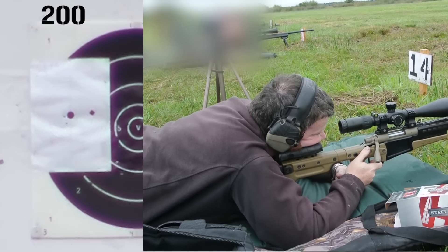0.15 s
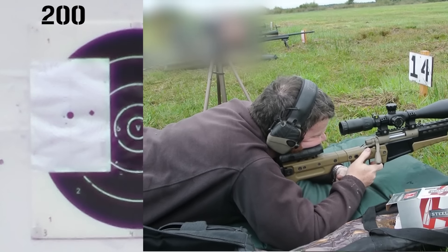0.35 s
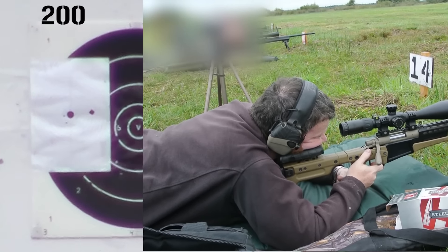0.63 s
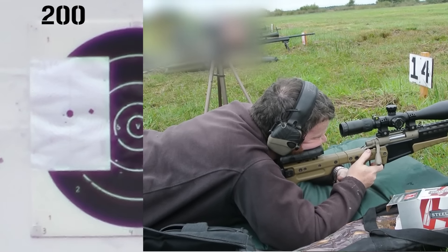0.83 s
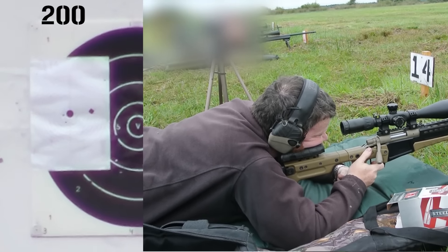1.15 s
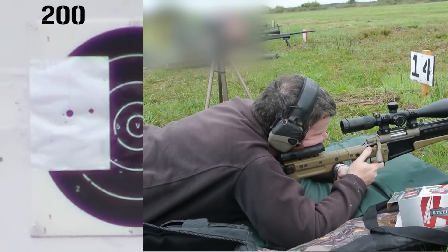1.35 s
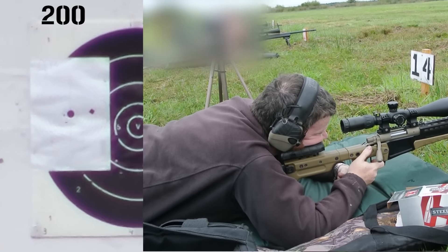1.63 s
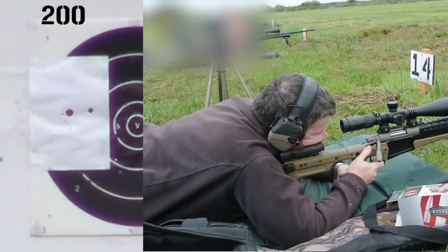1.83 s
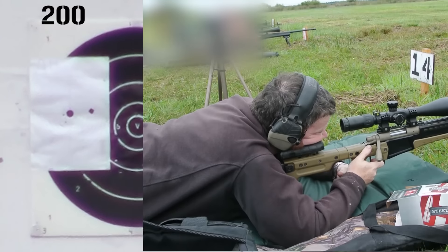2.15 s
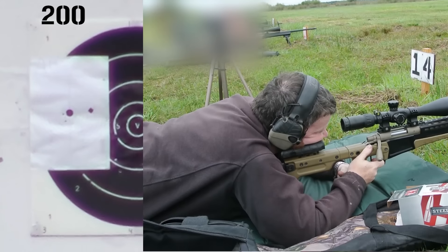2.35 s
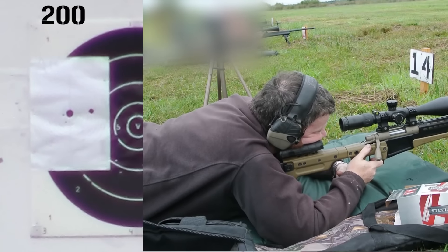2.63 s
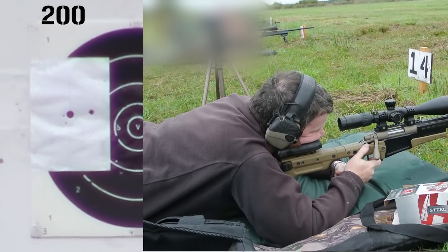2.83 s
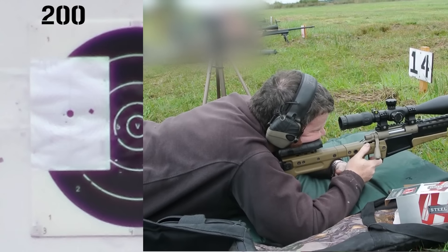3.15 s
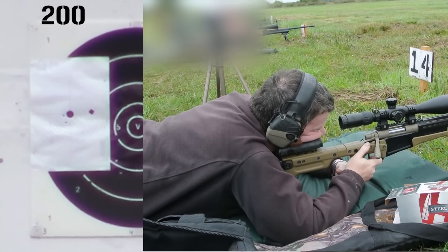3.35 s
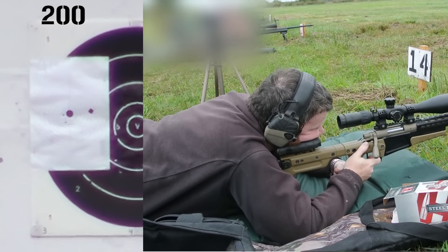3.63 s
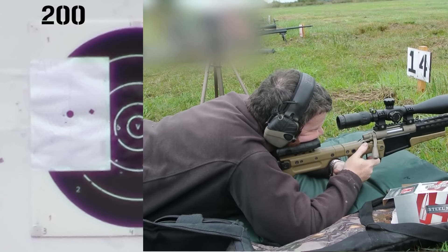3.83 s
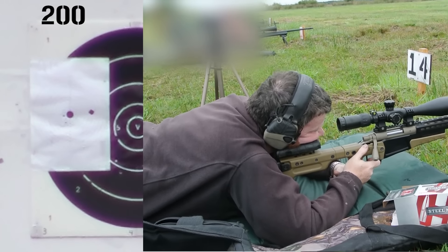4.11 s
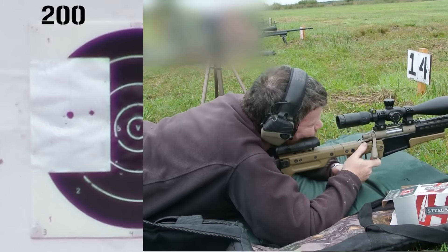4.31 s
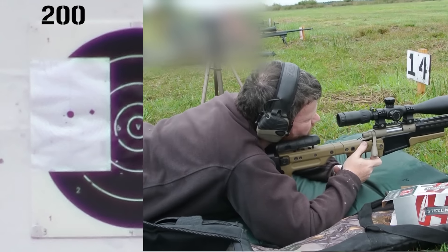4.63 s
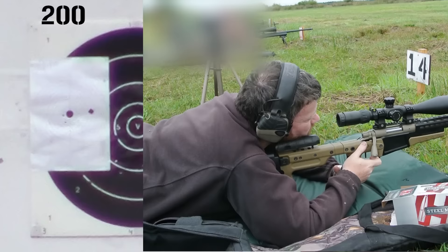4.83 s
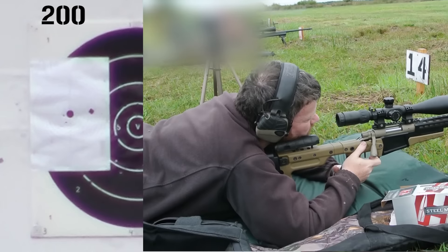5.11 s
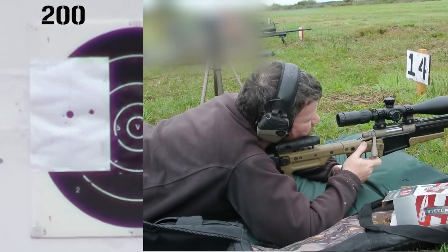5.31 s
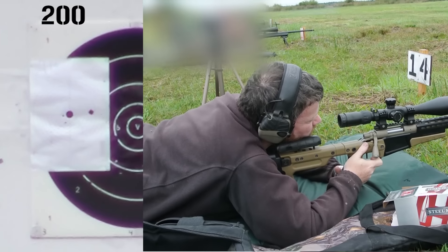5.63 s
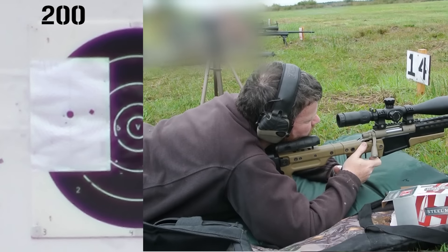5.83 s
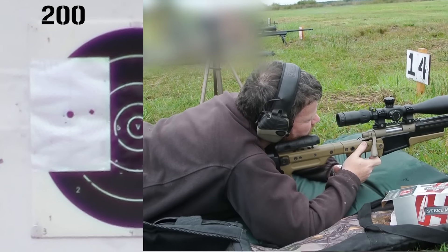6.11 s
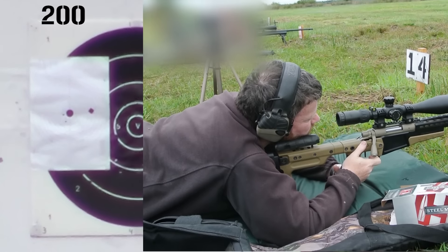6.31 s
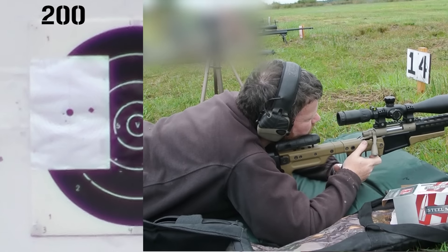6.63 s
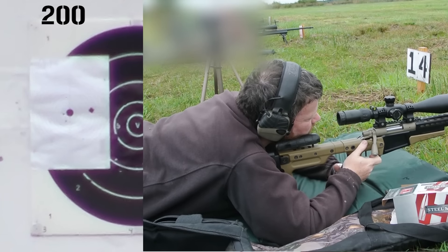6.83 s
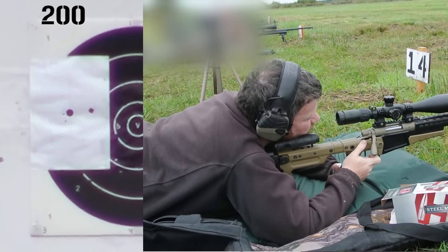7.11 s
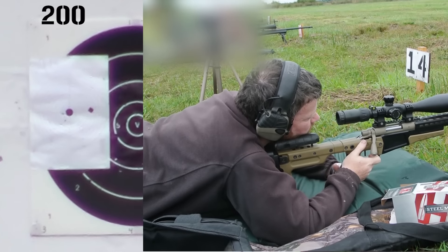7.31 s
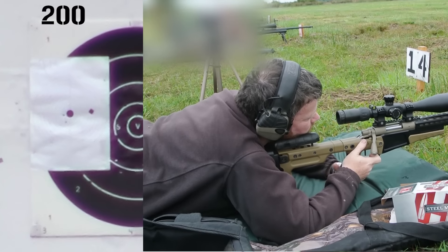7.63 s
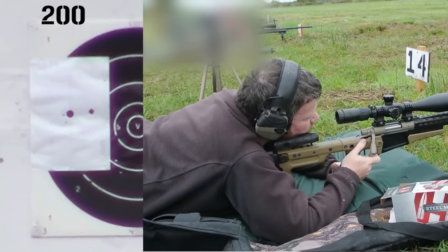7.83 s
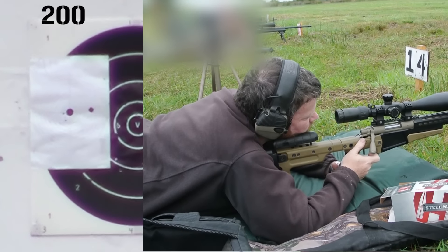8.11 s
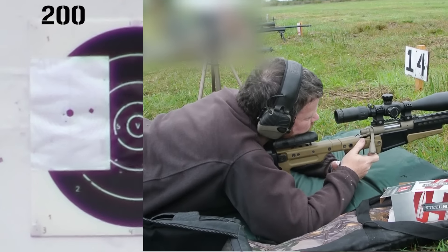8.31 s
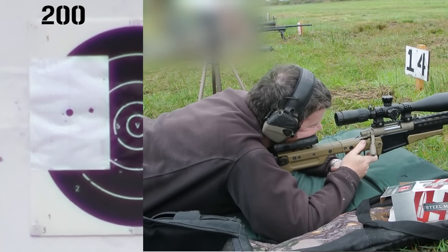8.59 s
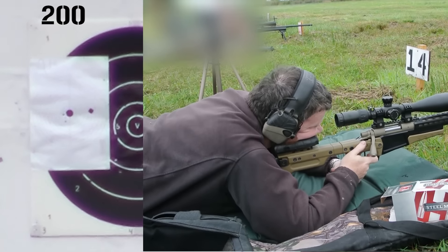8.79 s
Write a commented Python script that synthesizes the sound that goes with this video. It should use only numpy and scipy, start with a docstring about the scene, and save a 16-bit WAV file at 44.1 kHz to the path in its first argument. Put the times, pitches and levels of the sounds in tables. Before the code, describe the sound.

On an outdoor firing line with a faint rustle of grass and trees, four rifle shots go off at uneven intervals, echoing for about a second each. The second has the hardest crack. After it come quiet knocks of gear and the light metallic clicks and scrapes of a bolt. The last two shots carry a bright hiss, while low, lumpy wind rumble builds on the microphone.

```python
"""Four rifle shots from neighbours on the firing line of an open, grassy range.
Each is a shock-wave crack, a low thump and a hiss of muzzle gas that the field scatters back;
banks and trees reflect it for about a second. In the lull a rifle bolt is worked and its steel rings.
Gear knocks along the line, grass and trees rustle, and rising gusts buffet the microphone."""
import sys
import numpy as np
from scipy import signal
from scipy.fft import rfft, irfft, next_fast_len
from scipy.io import wavfile

SR = 44100
rng = np.random.default_rng(int(sys.argv[2]) if len(sys.argv) > 2 else 0)


def waveform_to_disk(signal):
    """Save audio, clipped to [-1, 1], as 16-bit WAV at the path in sys.argv[1]."""
    frames = np.transpose(np.atleast_2d(signal))
    scaled = np.clip(frames, -1, 1) * 32767
    samples = np.round(scaled).astype(np.int16)
    wavfile.write(sys.argv[1], SR, samples)


N = 395136
TIME = np.arange(N) / SR
AGE, BRIEF = TIME[:round(1.4 * SR)], TIME[:SR // 5]   # time axes of a shot and of a short event

# the shots: start_s, crack_db, thump_db, thump_hz, swell_s, reflection_db, roll_db, roll_hz
SHOTS = [(0.9028, 4, -1.5, 198, 0.0031, -27.5, -24.5, 255.2),
         (2.021, 13, -0.5, 187.4, 0.00165, -9, -28, 318.4), (5.048, -23, -5.5, 189, 0.002, -26, -31, 305),
         (7.1351, -18, -5, 187, 0.0032, -29, -25.5, 250)]
# spectrum of a sharp burst off a hard surface: frequency_hz, density_db
BURST_SPECTRUM = [(400, -19.5), (900, -12.5), (1500, -3), (3000, 4.5), (4800, -4.5), (7000, -11),
                  (11000, -18), (15500, -19.5)]
# spectrum of what grass and leaves send back: frequency_hz, density_db
FIELD_SPECTRUM = [(500, -15), (1000, -8.5), (1600, -1), (2500, 5), (3600, 4), (5000, -2), (7000, -7.5),
                  (9500, -12), (12000, -15.5), (15500, -29)]
# the background level, which ducks after the first two shots and creeps back: time_s, relative_level_db
BACKGROUND_LEVEL = [(0.0, -66), (0.82, -68.5), (1.27, -74.5), (1.97, -71), (2.14, -84), (3.67, -82.5),
                    (4.21, -79), (4.62, -78), (5.89, -71.5), (6.69, -70), (8.11, -61), (8.96, -62.5)]


def from_db(db):
    return 10 ** (np.asarray(db) / 20)


def panned(x, left_db):
    """A level difference between the channels places a source to one side."""
    return x * from_db([[left_db / 2], [-left_db / 2]])


def add(out, start_s, x):
    """Superposition: x adds to the sound from start_s on."""
    at = int(np.clip(round(start_s * SR), 0, N - 1))
    out[:, at:at + x.shape[-1]] += x[..., :N - at]


def low_pass(x, hz):
    return signal.sosfilt(signal.butter(6, min(hz, .45 * SR), fs=SR, output="sos"), x)


def noise(spectrum, size, apart):
    """Unit-rms stereo noise from (frequency_hz, density_db) rows; apart is the side-to-mid ratio."""
    hz, db = np.transpose(spectrum)
    length = next_fast_len(size)
    bins = np.maximum(np.fft.rfftfreq(length, 1 / SR), 1)
    skirt = np.minimum(bins / hz[0], 1) ** 2
    gain = skirt * from_db(np.interp(np.log(bins), np.log(hz), db))
    mid, side = irfft(rfft(rng.standard_normal((2, length))) * gain, length)[:, :size]
    x = mid + apart * side * [[1], [-1]]
    return x / x.std()


def lumps(size, spread_db):
    """Random amplitude modulation: a gain with a few dozen humps a second."""
    return from_db(spread_db * noise([(2, -4), (18, -1.5), (60, -22.5), (600, -88)], size, apart=.2))


def swell(peak_s):
    """Envelope of a critically damped response: rises to 1 at peak_s, then dies away."""
    return BRIEF / peak_s * np.exp(1 - BRIEF / peak_s)


def plateau(peak_s, hold_s, rise_db_per_s, fall_db_per_s):
    """Exponential growth to 1 at peak_s, a hold, then exponential decay."""
    early_s, late_s = np.maximum(peak_s - AGE, 0), np.maximum(AGE - peak_s - hold_s, 0)
    return from_db(-rise_db_per_s * early_s - fall_db_per_s * late_s)


def thump(hz, swell_s):
    """The microphone's bass cut leaves a pressure push as a few low cycles: a resonance passed twice."""
    radius = np.exp(-1 / (swell_s * SR))
    poles = [1, -2 * radius * np.cos(2 * np.pi * hz / SR), radius * radius]
    impulse = 1. * (BRIEF == 0)
    x = signal.lfilter([1, -1], poles, signal.lfilter([-1, 1], poles, impulse))
    return x / np.abs(x).max()


def rustle(gain_db=4):
    """Airflow through distant grass and trees makes smooth broadband noise."""
    # spectrum of the rustle: frequency_hz, density_db
    spectrum = [(150, -3), (380, 2), (560, -2.5), (750, -2), (1100, 0.5), (1400, -3), (1650, -3),
                (2000, -8), (3000, -10.5), (3800, -11.5), (5000, -16), (8000, -19.5), (12000, -26.5),
                (15500, -44)]
    level_db = gain_db + np.interp(TIME, *np.transpose(BACKGROUND_LEVEL))
    return from_db(level_db) * noise(spectrum, N, apart=.39)


def wind_strength(background_gain_db=-2):
    """Incoherent sources add in power: a floor that follows the background level, plus gusts."""
    # bell-shaped gusts: centre_s, relative_level_db, half_length_s
    gusts = [(.25, -70, 0.14), (5.81, -68, 0.9), (6.142, -46, 0.12), (6.65, -47, .17), (7.004, -45.5, 0.44),
             (8.315, -38, 0.21), (8.825, -38.5, 0.21)]
    floor = from_db(background_gain_db + np.interp(TIME, *np.transpose(BACKGROUND_LEVEL)))
    gust_power = sum((from_db(db) * np.exp(-np.minimum(((TIME - centre_s) / half_s) ** 2, 20))) ** 2
                     for centre_s, db, half_s in gusts)
    return np.sqrt(floor ** 2 + gust_power)


def wind(rumble_gain_db=2, eddy_gain_db=-5, breakup_gain_db=-9, swell_cycles=.85):
    """Turbulence makes a lumpy rumble; the largest eddies thump the microphone and break up."""
    # spectrum of the turbulent pressure: frequency_hz, density_db
    rumble_spectrum = [(25, -26), (50, -12), (90, 3.5), (160, 2.5), (260, -6), (370, -11.5), (520, -24),
                       (800, -39), (1500, -55.5)]
    # the strongest eddies: start_s, relative_level_db, pitch_hz
    buffets = [(3.62, -55, 107), (3.713, -52.5, 197), (4.964, -51, 152.4), (5.672, -40.5, 162),
               (5.831, -38, 150), (6.023, -26.5, 138), (6.101, -30, 194.5), (6.203, -22.5, 170.7),
               (6.467, -29.5, 197.8), (6.797, -27.5, 209), (6.955, -18.5, 167), (7.017, -26, 206),
               (7.039, -22.5, 178), (7.166, -16, 221), (7.945, -22.5, 270), (8.154, -21, 171),
               (8.274, -20.5, 176), (8.375, -14, 161), (8.42, -17, 191), (8.708, -16.5, 203),
               (8.833, -16.5, 239), (8.909, -11.5, 196)]
    breakup_spectrum = [(60, -26), (110, -1), (180, 7), (370, -3), (600, -23), (1000, -44), (3000, -80)]
    strength = wind_strength() * from_db(rumble_gain_db) * lumps(N, spread_db=4.5)
    out = strength * noise(rumble_spectrum, N, apart=.2)
    for start_s, db, hz in buffets:
        swell_s = swell_cycles / hz   # larger eddies are lower and slower
        eddy = from_db(eddy_gain_db) * panned(thump(hz, swell_s), rng.normal(0, 1.2))
        breakup = from_db(breakup_gain_db) * noise(breakup_spectrum, len(BRIEF), apart=.85)
        add(out, start_s, from_db(db) * (eddy + breakup * swell(1.25 * swell_s)))
    return low_pass(out, hz=900)


def faint_ticks():
    """Narrow-band noise in very short bursts is heard as dry ticks with a hint of pitch."""
    # ticks before the first shot: start_s, level_db, pitch_hz
    ticks = [(0.38, -60.5, 3830), (0.616, -58, 3460), (.838, -60, 3100)]
    out = np.zeros((2, N))
    for start_s, db, hz in ticks:
        band = noise([(hz / 2, -18), (hz, 0), (hz * 1.3, -18), (hz * 2, -35)], len(BRIEF), apart=.22)
        add(out, start_s, from_db(db) * band * swell(peak_s=.0018))
    return out


def gear_knocks():
    """Heavily damped impacts: each is a dull thud with a clack on top."""
    # knocks of gear along the line: start_s, thud_db, clack_db, decay_s
    knocks = [(1.890, -38, -50.5, 0.0063), (2.469, -45.5, -72, .003), (2.526, -48, -72, 0.0043),
              (3.015, -53, -65, .005), (3.055, -65, -57.5, 0.0043), (3.098, -42.5, -61, 0.0089),
              (4.097, -74, -51, 0.0043), (4.299, -76, -54, 0.0064), (4.81, -74, -59.5, 0.0031),
              (4.8318, -50.5, -37.5, 0.0044), (6.882, -62, -59, 0.012)]
    spectrum = [(300, -3.5), (900, -10), (2400, 4.5), (5000, -8.5), (8000, -10.5), (15000, -50)]
    out = np.zeros((2, N))
    for start_s, thud_db, clack_db, decay_s in knocks:
        clack = noise(spectrum, len(BRIEF), apart=.21) * np.exp(-BRIEF / decay_s)
        add(out, start_s, from_db(thud_db) * thump(hz=230, swell_s=.0027) + from_db(clack_db) * clack)
    return out


def steel_ring(spread_db=10.5):
    """Modal vibration: each contact shares the same total power differently among the damped modes."""
    # modes of the bolt's steel: pitch_hz, level_db, t60_s, left_over_right_db
    modes = [(1484, -15, 0.039, -3), (1784, -25, 0.03, 1), (2160, -21, 0.037, -2), (2600, -31, .02, 0),
             (2980, -3, 0.034, 2), (3500, -26, 0.019, 4), (4310, -18, 0.022, 9), (6170, 0, 0.06, 14),
             (6300, -21.5, 0.031, 30), (6680, -22, 0.075, 6), (7030, -7, 0.03, 7), (7650, -26, 0.024, 15),
             (12020, -39, .06, -5), (13800, -35, 0.069, -6), (14340, -36, 0.12, -6)]
    mode_db = np.transpose(modes)[1]
    strengths = from_db(mode_db + rng.normal(0, spread_db, len(modes)))
    strengths *= np.linalg.norm(from_db(mode_db)) / np.linalg.norm(strengths)
    return sum(panned(strength * from_db(-60 * BRIEF / t60_s) * np.sin(2 * np.pi * hz * BRIEF), left_db)
               for (hz, _, t60_s, left_db), strength in zip(modes, strengths))


def bolt(ring_gain_db=-10, rattle_db=-59.5, rattle_s=.13, tick_s=.0038, slide_s=.047):
    """Impact and friction: each contact ticks, rings and slides on; the sliding steel sticks and slips."""
    # the bolt's main contacts: start_s, relative_level_db
    contacts = [(3.2177, -56.5), (3.255, -50), (3.2964, -47), (3.9556, -41), (4.0325, -46.5), (4.0557, -51),
                (4.0754, -50), (4.0962, -40.5), (4.1051, -37), (4.1212, -47), (4.1408, -42)]
    # the bolt sliding in its race: start_s, level_db, swell_s
    slides = [(3.25, -76.5, 0.034), (4.03, -80, 0.049), (4.134, -69.5, 0.019), (4.252, -73.5, 0.022)]
    scrape_spectrum = [(1200, -3), (1700, 2), (3200, 9), (4800, -16), (6500, -11), (9000, -28),
                       (15000, -26.5)]
    out = np.zeros((2, N))
    # every slide shakes a few light contacts loose
    rattles = [(start_s + rattle_s * when, rattle_db) for start_s, *_ in slides for when in rng.random(5)]
    tick_and_slide = from_db(-17.5) * np.exp(-BRIEF / tick_s) + from_db(-29.5) * np.exp(-BRIEF / slide_s)
    for start_s, db in contacts + rattles:
        ring = from_db(ring_gain_db) * steel_ring()
        contact = tick_and_slide * noise(BURST_SPECTRUM, len(BRIEF), apart=.6)
        add(out, start_s, from_db(db) * (ring + contact))
    for start_s, db, swell_s in slides:
        scrape = noise(scrape_spectrum, len(BRIEF), apart=.26)
        stick_slip_db = 9.5 * noise([(40, 10), (160, -5.5), (500, -29), (3000, -80)], len(BRIEF), apart=.1)
        add(out, start_s, from_db(db + stick_slip_db) * scrape * swell(swell_s))
    return out


def air_absorption(x, db_per_s_at_10khz=15.5):
    """Air absorbs treble along the path, so later returns are duller."""
    size, step_s = next_fast_len(len(AGE) + len(BRIEF)), AGE[-1] / 4
    spectrum = rfft(x, size)
    loss_db_per_s = db_per_s_at_10khz * (np.fft.rfftfreq(size, 1 / SR) / 10000) ** 2.8
    out = np.zeros_like(x)
    for k in range(5):   # crossfade through five travel times
        dulled = irfft(spectrum * from_db(-loss_db_per_s * k * step_s), size)[:, :len(AGE)]
        out += dulled * np.maximum(1 - np.abs(AGE / step_s - k), 0)
    return out


def foliage(tilt_db_per_octave, size):
    """Scattering by leaves and grass splinters a shot into gritty noise."""
    spectrum = [(hz, db + tilt_db_per_octave * np.log2(hz)) for hz, db in FIELD_SPECTRUM]
    grit_db = 1.5 * noise([(40, -1.5), (250, -1), (800, -23.5), (5000, -78.5)], size, apart=.1)
    return low_pass(noise(spectrum, size, apart=.057), hz=9000) * from_db(grit_db)


def far_echoes(tree_gap_s=.029, second_gain_db=2.9, woods_behind_s=.13):
    """Path length sets delay: bank, tree line and woods answer in turn over a diffuse wash and a boom."""
    # echo paths, one row per shooter's position: bank_delay_s, bank_db, bank_gap_s, trees_delay_s,
    # trees_db, woods_db, woods_tilt_db_per_octave, wash_db, boom_delay_s, boom_db
    paths = [(0.23, -56.5, 0.045, .657, -56, -62.5, -1.5, -62, .71, -52),
             (.282, -66.5, 0.021, .725, -62.5, -69.5, -0.5, -67, .51, -54.5),
             (.349, -53, 0.05, .727, -46.5, -54.5, -4, -58, 0.87, -60),
             (.281, -44.5, 0.02, .671, -40.5, -43.5, -5.5, -50, 0.47, -54)]
    out, size = np.zeros((2, N)), len(AGE)
    for (start_s, *_), path in zip(SHOTS, paths):
        bank_s, bank_db, bank_gap_s, trees_s, trees_db, woods_db, woods_tilt, wash_db, boom_s, boom_db = path
        bank, trees = (bank_s, bank_gap_s, bank_db, 3), (trees_s, tree_gap_s, trees_db, 0)
        for delay_s, gap_s, db, tilt in bank, trees:
            for k in range(2):   # each answers twice in quick succession
                echo = foliage(tilt, len(BRIEF)) * swell(peak_s=.01)
                add(out, start_s + delay_s + k * gap_s, from_db(db + k * second_gain_db) * echo)
        woods = foliage(woods_tilt, size) * lumps(size, spread_db=1.64)
        woods *= plateau(trees_s + woods_behind_s, hold_s=.1, rise_db_per_s=326, fall_db_per_s=115.5)
        # countless small returns from the whole field
        wash = air_absorption(noise(FIELD_SPECTRUM, size, apart=.16)) * lumps(size, spread_db=1.43)
        wash *= plateau(peak_s=.5, hold_s=.036, rise_db_per_s=21, fall_db_per_s=33)
        add(out, start_s, from_db(woods_db) * woods + from_db(wash_db) * wash)
        add(out, start_s, from_db(boom_db) * boom(boom_s))
    return out


def boom(peak_s):
    """Low-frequency reverberation builds slowly and unevenly, then dies quickly."""
    # spectrum of the low echo: frequency_hz, density_db
    spectrum = [(50, -24), (110, -4.5), (200, 2.5), (280, -4.5), (400, -17), (700, -38), (1500, -59.5)]
    envelope = plateau(peak_s, hold_s=.015, rise_db_per_s=24.5, fall_db_per_s=133)
    return noise(spectrum, len(AGE), apart=.15) * envelope * lumps(len(AGE), spread_db=5.5)


def slap_echoes(rise_s=.00087, decay_s=.0018):
    """Reflection from hard surfaces returns the crack as a short, splintered burst."""
    # echoes from banks and target frames: arrival_s, relative_level_db, cutoff_hz
    reflections = [(.917, -26, 4200), (.934, -17.5, 3730), (0.953, -23.5, 3270), (1.112, -35, 11000),
                   (1.156, -32.5, 8680), (1.288, -43, 5970), (2.0519, -15.5, 3340), (2.093, -37, 2600),
                   (2.322, -37, 2780), (2.334, -40, 2400), (2.404, -40, 5000), (2.4218, -29, 14700),
                   (2.839, -46.5, 12050), (5.383, -27, 9000), (7.391, -22, 8100)]
    out = np.zeros((2, N))
    envelope = np.minimum(BRIEF / rise_s, 1) * np.exp(-BRIEF / decay_s)
    for arrival_s, db, cutoff_hz in reflections:
        burst = low_pass(noise(BURST_SPECTRUM, len(BRIEF), apart=.12), cutoff_hz)
        add(out, arrival_s, from_db(db) * burst * envelope)
    return out


def ground_roll(hz, hold_s=.025, fall=1.273, sink_ratio=.72, sink_s=.14):
    """Low sound propagates over the ground in uneven waves, sinking in pitch as it goes."""
    band = [(1 / 4, -14), (1 / 2, -6), (1, 0), (1.2, -3), (1.9, -26), (10, -65)]   # ratio, density_db
    near, far = (noise([(ratio * centre_hz, db) for ratio, db in band], len(AGE), apart=.15)
                 for centre_hz in (hz, sink_ratio * hz))
    nearness = np.exp(-AGE / sink_s)
    sinking = np.sqrt(nearness) * near + np.sqrt(1 - nearness) * far
    fade = (1 + AGE / hold_s) ** -fall * (1 - AGE / AGE[-1]) ** .5
    return sinking * fade * lumps(len(AGE), spread_db=.5)


def grass_scatter(hold_s=.05, fall=1.8):
    """Backscatter from the grass follows a shot as a power-law tail."""
    # spectrum of the backscatter: frequency_hz, density_db
    spectrum = [(600, -13), (1200, -10), (2200, -2), (3600, 0), (5200, 2), (8000, 0.5), (11000, -4.5),
                (13500, -15), (15500, -24)]
    return air_absorption(noise(spectrum, len(AGE), apart=.25)) * (1 + AGE / hold_s) ** -fall


def from_left(x, lean, direct_s=.09):
    """Acoustic shadow: the housing shades the right port's treble; later returns come from all sides."""
    treble = signal.sosfilt(signal.butter(1, [5500, 9300], "band", fs=SR, output="sos"), x)
    return x + treble * np.clip(lean, 0, 1) * np.exp(-AGE / direct_s) * [[1], [-1]]


def muzzle_gas(blast_db, hiss_db, hold_s, fall, lean):
    """A turbulent jet: blast and hiss fade by a power law, roughened as the gas leaves in eddies."""
    # spectrum of the jet's hiss: frequency_hz, density_db
    hiss_spectrum = [(1000, -14.5), (2200, -7.5), (3300, 3.5), (5000, -12), (6600, 0), (8300, -2.5),
                     (10500, -17.5), (13000, -15), (15500, -13.5)]
    # spectrum of the muzzle blast: frequency_hz, density_db
    blast_spectrum = [(300, -3), (550, -0.5), (800, -5.5), (1400, -6.5), (2100, -5.5), (3000, 1.5),
                      (4500, -12.5), (8000, -15), (15500, -31)]
    hiss = from_db(hiss_db) * noise(hiss_spectrum, len(AGE), apart=.21)
    blast = from_db(blast_db) * noise(blast_spectrum, len(AGE), apart=.38)
    eddies_db = 2.5 * noise([(50, 2.5), (400, -1.5), (1200, -26.5), (6000, -80.5)], len(AGE), apart=.1)
    return from_left(hiss + blast, lean) * from_db(eddies_db) * (1 + AGE / hold_s) ** -fall


def whistle(end_hz=6000, drop_hz=6100, drop_s=.0135, peak_s=.012, width_s=.0029, length_s=.035):
    """A brief falling whistle just after the blast, roughened by random phase modulation."""
    hz = end_hz + drop_hz * np.exp(-BRIEF / drop_s)
    wobble = .4 * noise([(100, 5.5), (600, -3), (3000, -25)], len(BRIEF), apart=.27)
    peak = np.exp(-((BRIEF - peak_s) / width_s) ** 2)
    trail = .55 * np.sin(np.pi * np.minimum(BRIEF / length_s, 1))
    return (peak + trail) * np.sin(2 * np.pi * np.cumsum(hz) / SR + wobble)


def crack(width_s=.00042, ring_hz=2300, ring_s=.00045):
    """The shock front is an N-wave that sets the microphone housing ringing."""
    n_wave = (2 * BRIEF / width_s - 1) * (BRIEF < width_s)
    return n_wave - .94 * np.sin(2 * np.pi * ring_hz * BRIEF) * np.exp(-BRIEF / ring_s)


def rifle_shots(reflection_s=.0048):
    """Shock wave, pressure push and gas jet arrive together; scatter and ground roll trail them."""
    # muzzle gas, one row per shot: blast_db, hiss_db, hold_s, fall_exponent, scatter_db, whistle_db,
    # left_lean (0-1)
    muzzles = [(-21, -28.5, 0.0041, 1.5, -42.5, -54.5, 0), (-5.5, -26.5, .012, 3.3, -46, -61, 0.4),
               (-21, -11.5, 0.026, 3.48, -35, -17, 0.93), (-46, -14, 0.0042, 1.37, -31, -34, 0.83)]
    out = np.zeros((2, N))
    # a close, inverted reflection colours the low end by interference
    reflection = -(thump(hz=250, swell_s=.002) + .24 * thump(hz=736, swell_s=.002))
    for shot, muzzle in zip(SHOTS, muzzles):
        start_s, crack_db, thump_db, thump_hz, swell_s, reflection_db, roll_db, roll_hz = shot
        blast_db, hiss_db, hold_s, fall, scatter_db, whistle_db, lean = muzzle
        add(out, start_s, from_db(crack_db) * crack() + from_db(thump_db) * thump(thump_hz, swell_s))
        add(out, start_s + reflection_s, from_db(reflection_db) * reflection)
        add(out, start_s, from_db(whistle_db) * panned(whistle(), left_db=11.5))
        add(out, start_s, muzzle_gas(blast_db, hiss_db, hold_s, fall, lean))
        add(out, start_s, from_db(scatter_db) * grass_scatter())
        add(out, start_s, from_db(roll_db) * ground_roll(roll_hz))
    return out


def scene():
    gunfire = rifle_shots() + far_echoes() + slap_echoes()
    return gunfire + bolt() + gear_knocks() + wind() + rustle() + faint_ticks()


def record(dry, bass_cut_hz=30, treble_cut_hz=15900):
    """Clipping and band limiting: the loudest cracks overload the input; deep bass and top are cut."""
    clipped = np.clip(dry, -1, 1)
    thinned = signal.sosfilt(signal.butter(1, bass_cut_hz, "high", fs=SR, output="sos"), clipped)
    return signal.sosfilt(signal.cheby1(12, .2, treble_cut_hz, fs=SR, output="sos"), thinned)


dry = scene()
out = record(dry)
waveform_to_disk(out)
```